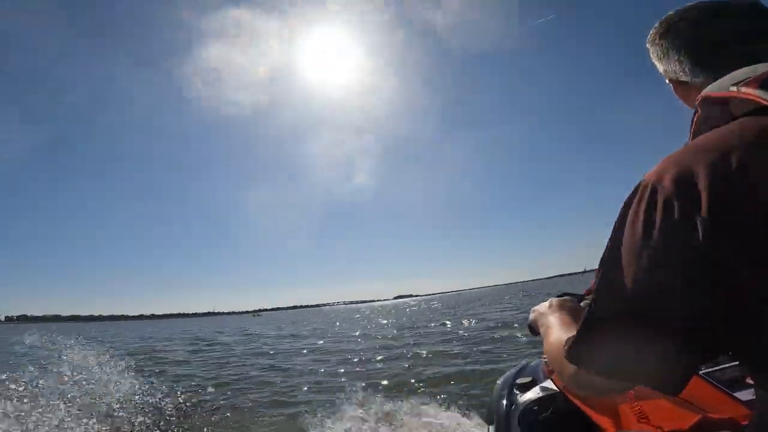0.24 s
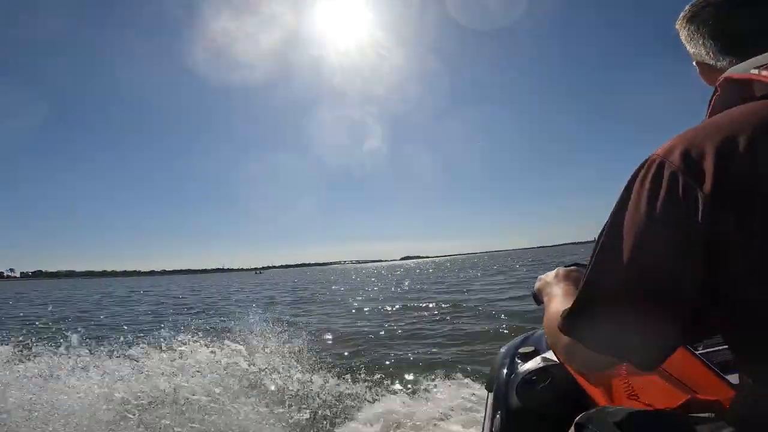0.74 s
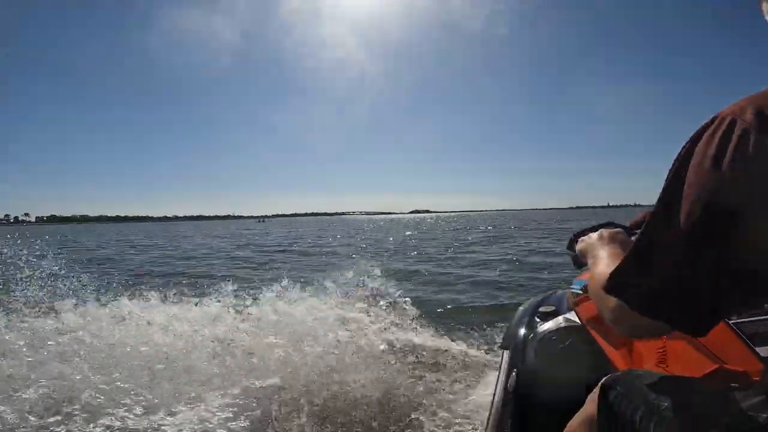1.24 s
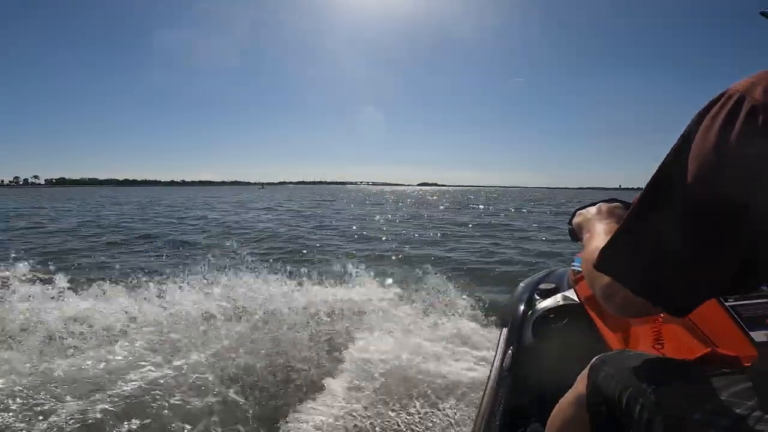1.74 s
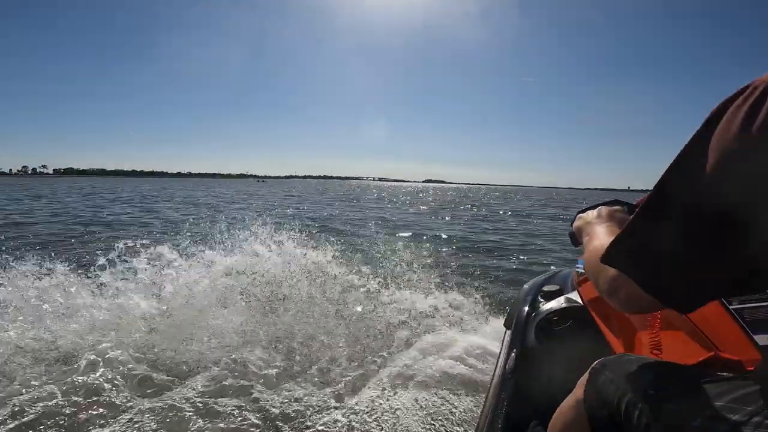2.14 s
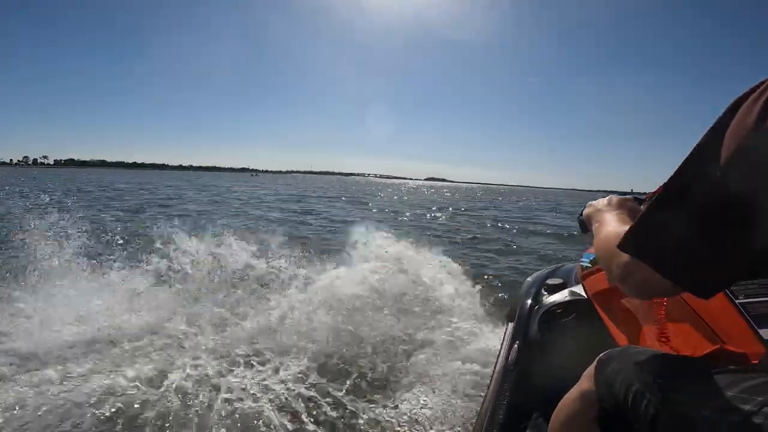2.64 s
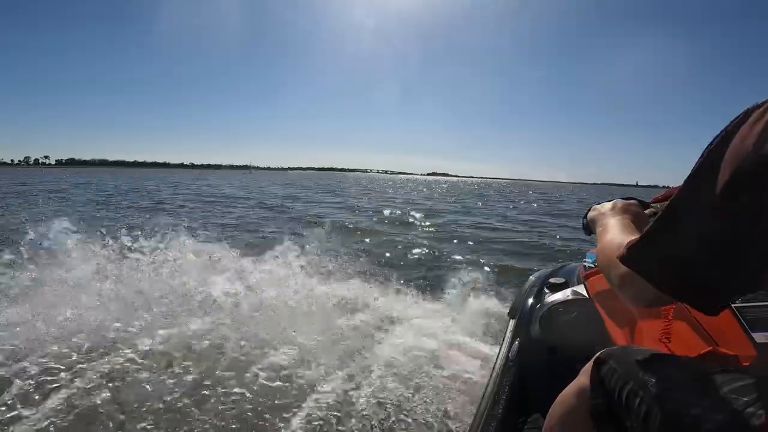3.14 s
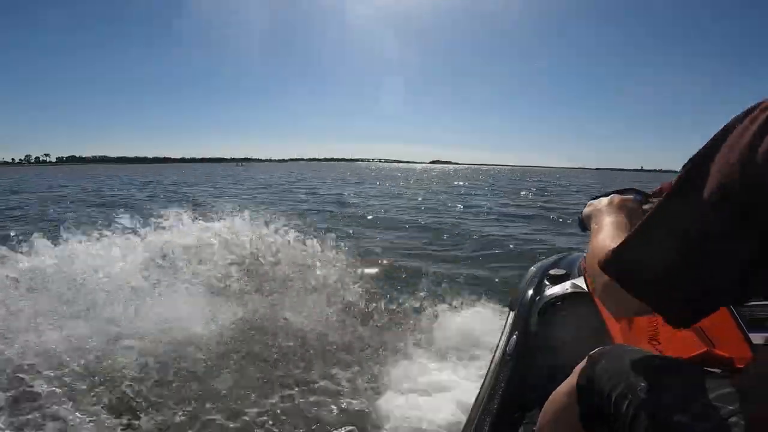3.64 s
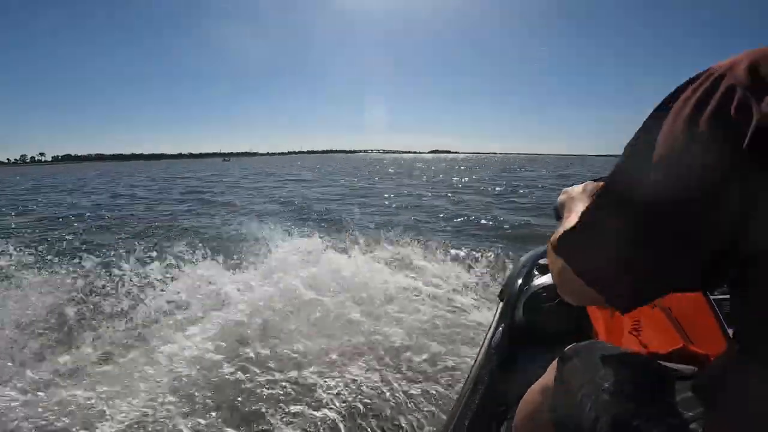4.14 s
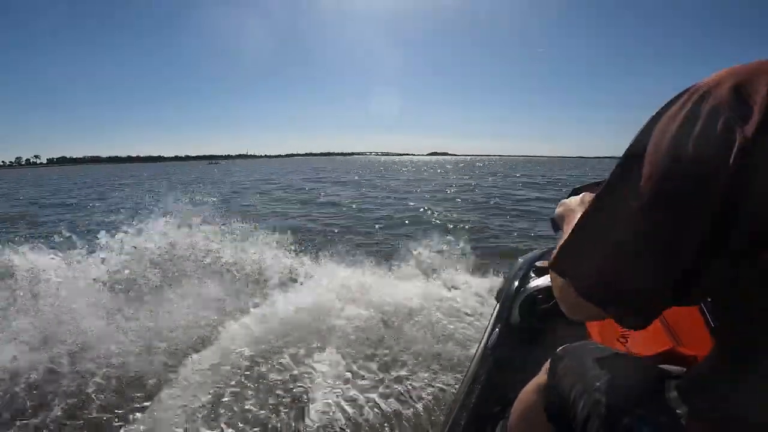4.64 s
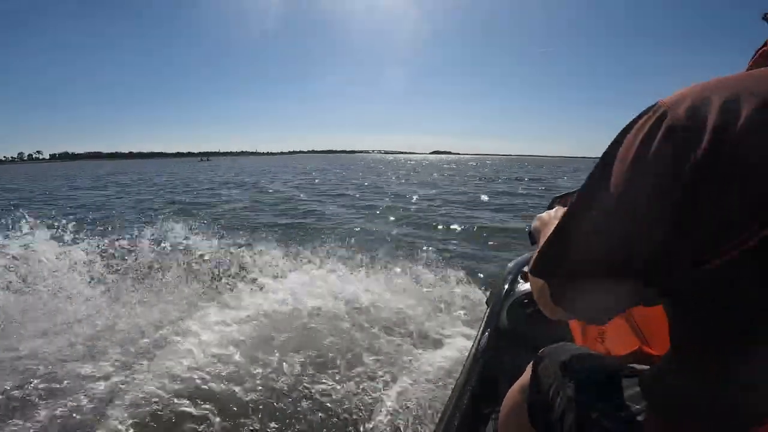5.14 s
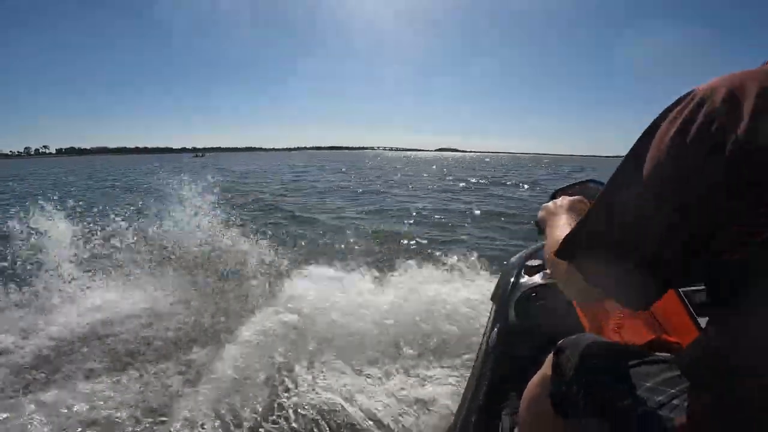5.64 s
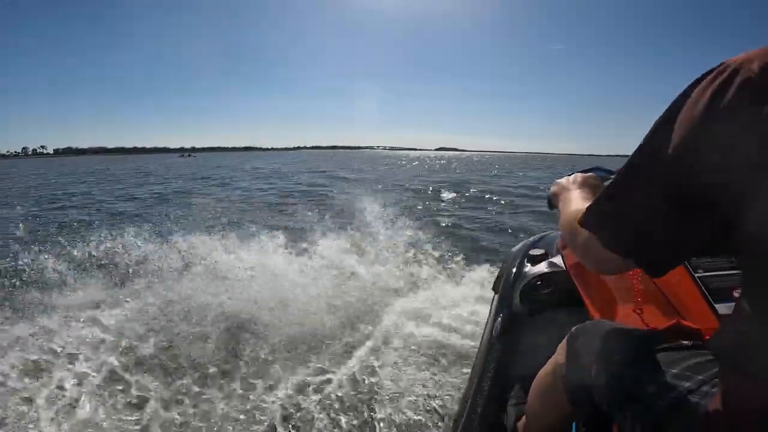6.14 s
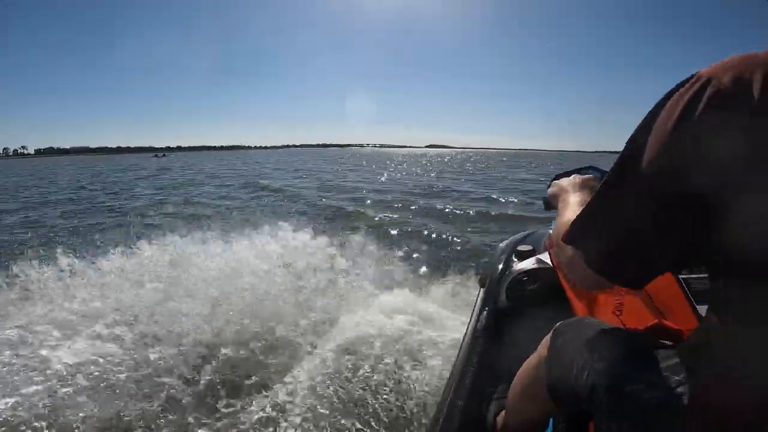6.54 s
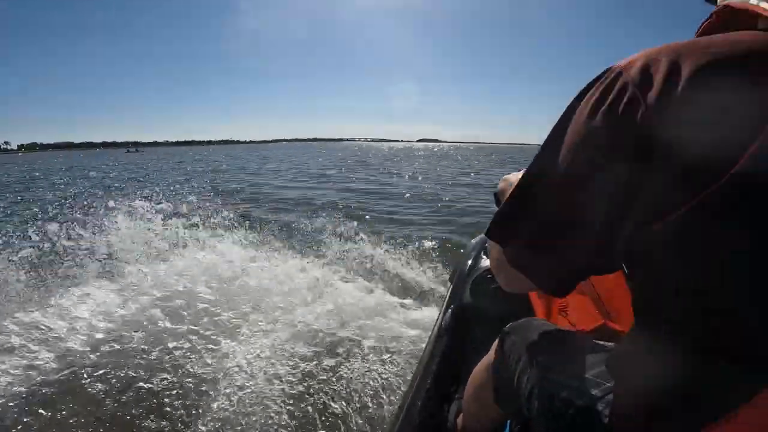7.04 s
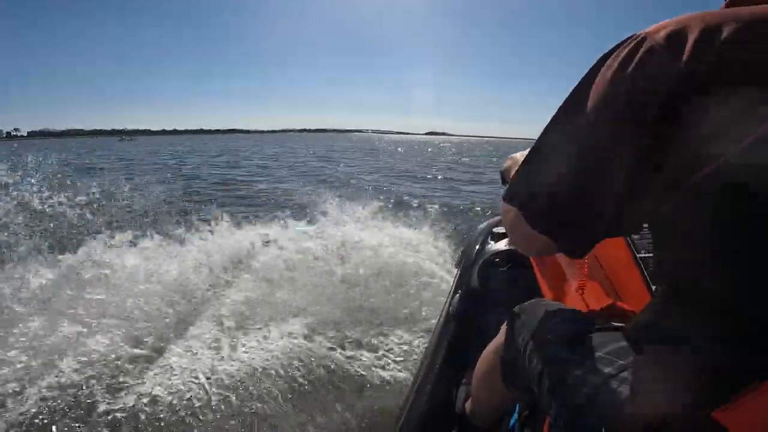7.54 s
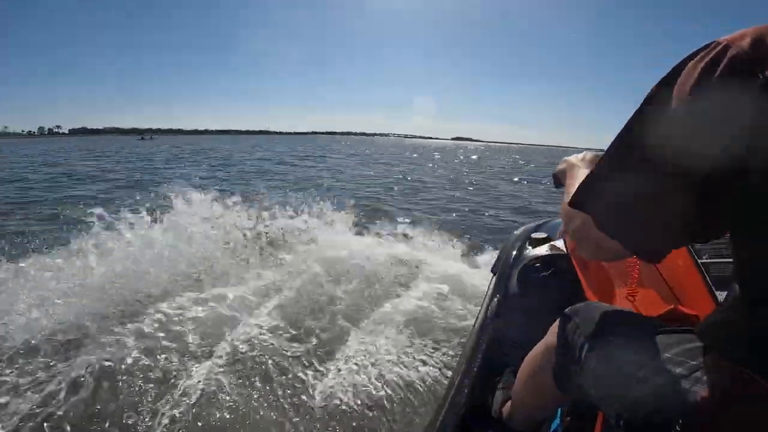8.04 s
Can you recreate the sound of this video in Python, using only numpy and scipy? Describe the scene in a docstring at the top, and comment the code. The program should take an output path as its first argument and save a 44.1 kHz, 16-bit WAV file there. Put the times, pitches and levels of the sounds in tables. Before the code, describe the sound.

A personal watercraft cruises over light chop on open water, its engine holding a steady drone with a thin, wavering whine from the jet pump. The hull booms softly on the waves while the wake rushes and spray hisses in swells. Wind buffets the onboard microphone throughout with low rumble and short, crackling puffs. Near the end the engine pitch dips briefly and recovers.

```python
"""On open water, aboard a personal watercraft cruising over light chop.
Its four-cylinder engine drones and turns a whining three-blade jet pump.
The hull booms on the waves, the wake rushes and spray hisses as countless drops.
Wind buffets the microphone in short ragged blasts, and a limiter ducks the drone under them."""
import sys
import numpy as np
from scipy import signal
from scipy.fft import rfft, irfft, next_fast_len
from scipy.io import wavfile
from scipy.ndimage import uniform_filter1d, minimum_filter1d, map_coordinates

SR = 44100
rng = np.random.default_rng(int(sys.argv[2]) if len(sys.argv) > 2 else 0)


def inscribe(sig):
    """Save sig as 16-bit PCM at rate SR to the path in sys.argv[1].

    A 1-D sig is mono; a 2-D sig holds one channel per row.
    Samples are clipped to [-1, 1] before scaling.
    """
    pcm = np.round(np.clip(np.atleast_2d(sig).T, -1, 1) * 32767)
    wavfile.write(sys.argv[1], SR, pcm.astype(np.int16))


N = 365148

# waves throwing up water: t/s, spray/dB, churn/dB, width/s
WAVE_SPLASHES = [(0.218, -66, -41.5, 0.24), (0.805, -50.5, -41.5, 0.36), (1.27, -51, -40.5, .07),
                 (1.4, -60, -39, 0.14), (2.906, -52, -36.5, 0.086), (3.155, -48.5, -35.5, 0.13),
                 (3.35, -56, -38.5, 0.11), (3.795, -46, -39, 0.1), (4.053, -45.5, -52, 0.17),
                 (4.244, -55, -45, .1), (4.49, -46, -37, .11), (5.03, -42, -41, .13),
                 (5.416, -49, -39, 0.18), (5.767, -56, -35, 0.41), (6.22, -46.5, -44.5, .36),
                 (6.643, -50.5, -50, .2), (7.9, -48, -43, 0.28)]


def amp(db):
    """Decibels to gain."""
    return 10 ** (np.asarray(db) / 20)


def unit(x):
    """Scaled to rms 1."""
    return x / np.sqrt(np.mean(x ** 2) + 1e-20)


def curves(rows):
    """One automation curve for each column after the time."""
    times, *columns = np.transpose(rows)
    return [np.interp(np.arange(N) / SR, times, column) for column in columns]


def wobble(rate):
    """A smooth random curve, rate knots a second."""
    knots = rng.standard_normal(N // 8)
    return map_coordinates(knots, [np.arange(N) * rate / SR + 2], mode="wrap")


def swell(at, width_s):
    """A smooth rise and fall around a moment, width_s wide at half height."""
    return .5 ** ((2 * (np.arange(N) / SR - at) / width_s) ** 2)


def filtered(x, response):
    """x through an EQ whose gain is a function of frequency."""
    size = next_fast_len(N + SR // 2)
    return irfft(rfft(x, size) * response(np.fft.rfftfreq(size, 1 / SR)), size)[:N]


def coloured(x, spectrum):
    """x shaped by (f/Hz, level/dB) points on a log axis, at rms 1."""
    f, db = np.transpose(spectrum)
    return unit(filtered(x, lambda hz: amp(np.interp(np.log(hz + 1), np.log(f), db, right=-120))))


def noise(spectrum):
    """Coloured noise of rms 1."""
    return coloured(rng.standard_normal(N), spectrum)


def drops(rate, spread_db):
    """Tiny impacts of random size, about rate a second, at rms 1."""
    lands = rng.random(N) < rate / SR
    return unit(lands * rng.standard_normal(N) * amp(spread_db * rng.standard_normal(N)))


def patchy(x, depth_db):
    """Each region of pitch swells and fades on its own, at rms 1."""
    bands = signal.stft(x, nperseg=512)[2]
    patches = uniform_filter1d(rng.standard_normal(bands.shape), size=12, axis=0)
    patches = uniform_filter1d(patches, size=14, axis=1)
    return unit(signal.istft(bands * amp(depth_db * unit(patches)), nperseg=512)[1][:N])


def shaft_tones(angle, partials, rough_db, drift_rad, rate):
    """Tones locked to the shaft, wavering in level and phase, at rms 1."""
    tones = np.zeros(N)
    for multiple, db in partials:
        phase = round(multiple) * angle + 2 * np.pi * rng.random() + drift_rad * wobble(rate)
        tones += amp(db + rough_db * wobble(rate)) * np.sin(phase)
    return unit(tones)


def engine(shaft_hz, angle, firing_db):
    """Two firings a turn make a clean drone whose octave rings a hull panel as it slides into tune."""
    panel_hz, half_width_hz = 300, 4
    firing = amp(firing_db) * shaft_tones(angle, [(2, 0)], rough_db=1.04, drift_rad=0.067, rate=30)
    in_tune = 1 / (1 + ((4 * shaft_hz - panel_hz) / half_width_hz) ** 2)
    effort = amp(firing_db - firing_db.mean())
    octave = shaft_tones(angle, [(4, 0)], rough_db=5.0, drift_rad=0.24, rate=20)
    return firing + effort * (amp(-38.5) + amp(-35) * in_tune) * octave


def jet_pump(angle, shake, drone_db, whine_db):
    """The blades hum through the hull; the pump's drone and whine waver in the aerated water."""
    # low, middle and high tones: multiple of the shaft speed, level within the group/dB
    blade_tones = [(3, -4.5), (5, -15)]
    drone_tones = [(6, -2), (7, -14.5)]
    whine_tones = [(12, -1), (15, -9.5)]
    blades = shake * amp(-7.5) * shaft_tones(angle, blade_tones, rough_db=0, drift_rad=0.4, rate=20)
    drone = amp(drone_db) * shaft_tones(angle, drone_tones, rough_db=3.0, drift_rad=0.71, rate=24)
    whine = amp(whine_db) * shaft_tones(angle, whine_tones, rough_db=3.5, drift_rad=0.73, rate=24)
    return blades + drone + whine


def hull_shake():
    """How hard the chop shakes the hull: a restless bed with a swell at each wave."""
    # the hull meets a wave: t/s, peak/dB
    bumps = [(0.69, -18.5), (0.97, -22.5), (1.25, -24), (1.64, -22.5), (2.66, -22), (3.1, -17),
             (4.28, -21.5), (4.48, -17.5), (4.87, -25), (5.14, -22.5), (5.4, -24), (5.65, -21), (5.82, -21),
             (6.53, -23), (6.72, -21.5)]
    bed = amp(-25 + 2 * wobble(9))
    return np.sqrt(bed ** 2 + sum((amp(db) * swell(at, width_s=0.16)) ** 2 for at, db in bumps))


def hull_boom(shake):
    """The shaken hull booms in a narrow low band."""
    # hull resonance: f/Hz, level/dB
    boom_eq = [(90, -37.5), (150, -3.5), (185, 0.5), (222, 0.5), (255, -8.5), (330, -23), (600, -44.5)]
    return shake * noise(boom_eq)


def wake():
    """Water tumbles beside the hull and churns harder at each splash."""
    # the running wash: t/s, level/dB
    wash = [(0, -42.5), (0.5, -42.5), (1.1, -43.5), (1.9, -41), (2.9, -39), (3.55, -40.5), (4.7, -38.5),
            (5.45, -38.5), (6.1, -38), (7.35, -37), (8.28, -35.5)]
    # tumbling water: f/Hz, level/dB
    wake_eq = [(200, -9.5), (600, -6.5), (1200, -2.5), (1700, 2.1), (2200, 0.5), (3100, -2), (4700, -12),
               (6000, -24), (9000, -44)]
    wash_db, = curves(wash)
    power = amp(wash_db + 0.35 * wobble(16)) ** 2
    power += sum((amp(db) * swell(at, width_s)) ** 2 for at, _, db, width_s in WAVE_SPLASHES)
    level = np.sqrt(power) * amp(0.87 * wobble(60))
    return level * patchy(coloured(drops(rate=16000, spread_db=3.0), wake_eq), depth_db=1)


def spray():
    """Countless drops fall in a hissing sheet, and each splash throws up more."""
    # the steady sheet: t/s, level/dB
    sheet_levels = [(0, -47), (1.5, -49), (2.6, -47), (3.4, -49), (6.2, -47), (7.25, -49), (8.28, -47)]
    # the sheet's hiss and freshly thrown water: f/Hz, level/dB
    sheet_eq = [(1500, -24), (3200, 6), (4600, 5), (6200, -1.5), (7400, -2.5), (8700, -8.5), (10500, -15),
                (12000, -23.5), (14500, -35.5)]
    thrown_eq = [(1200, -10), (2800, 4), (4500, 6.5), (6200, -4.5), (8700, -11), (12000, -23.5),
                 (14500, -38.5)]
    sheet_db, = curves(sheet_levels)
    level = amp(sheet_db + 0.93 * wobble(27))
    sheet = level * patchy(coloured(drops(rate=18000, spread_db=-1.5), sheet_eq), depth_db=1.1)
    power = sum((amp(db) * swell(at, width_s)) ** 2 for at, db, _, width_s in WAVE_SPLASHES)
    thrown = np.sqrt(power) * coloured(drops(rate=20000, spread_db=2.5), thrown_eq)
    return sheet + thrown


def water():
    """Wake and spray together; their hiss dips briefly now and then."""
    # dips in the hiss: t/s, depth/dB (negative lifts it)
    lulls = [(1.01, 3.5), (1.66, 3), (3.26, 0), (4.41, 3.5), (4.58, -1.5), (6.85, 2)]
    dip_db = sum(db * swell(at, width_s=0.06) for at, db in lulls)
    return amp(-dip_db) * (wake() + spray())


def wind():
    """Eddies thump the microphone, harder in the gusts; the strongest tear into a ragged flutter."""
    # the wind bed: t/s, buffet/dB, flutter/dB
    breeze = [(0, -20.5, -28.5), (1.05, -22.5, -30), (1.5, -21.5, -28), (1.9, -22.5, -29.5),
              (2.7, -21, -28.5), (3.3, -19, -27), (3.7, -20, -29), (4.25, -18, -25.5), (4.9, -21, -29),
              (5.2, -21.5, -29.5), (5.85, -20, -26), (6.15, -23, -29), (6.8, -21.5, -28), (7.3, -26, -29.5),
              (8.28, -22.5, -24.5)]
    # broad gusts: t/s, peak/dB
    gusts = [(0.99, -18.5), (1.49, -14.5), (3.25, -20.5), (3.35, -9.5)]
    # deep buffet and midrange flutter: f/Hz, level/dB
    buffet_eq = [(12, -15.5), (22, 1.5), (50, -4.5), (100, -7), (170, -14), (300, -26), (700, -46.5)]
    flutter_eq = [(60, -20), (200, -9.5), (330, 2), (480, -1), (750, -4.5), (1200, -10.5), (2000, -20.5),
                  (4000, -35.5), (9000, -55.5)]
    buffet_db, flutter_db = curves(breeze)
    eddies = wobble(40)
    bed = amp(buffet_db + 2.5 * wobble(16))
    gust_power = sum((amp(db) * swell(at, width_s=0.063)) ** 2 for at, db in gusts)
    buffet = np.sqrt(bed ** 2 + gust_power) * unit(amp(2.1 * eddies) * noise(buffet_eq))
    flutter = amp(flutter_db) * unit(amp(1.16 * eddies + 1.7 * wobble(260)) * noise(flutter_eq))
    return buffet + flutter


def blasts():
    """Air hits the microphone and swells within milliseconds: a dull puff with a crackle on top."""
    # blasts of air: t/s, puff/dB, crackle/dB
    hits = [(0.112, -20.5, -32), (0.312, -21.5, -45), (0.893, -27, -44), (1.320, -23.5, -45),
            (1.437, -22.5, -47), (1.482, -18, -32), (1.540, -27.5, -38), (1.636, -24, -41),
            (1.717, -29, -35), (2.406, -22, -39), (2.929, -22, -42), (3.216, -23, -34), (3.32, -19.5, -42),
            (3.359, -18, -39), (3.825, -17.5, -31), (3.858, -24, -38), (4.047, -28, -45),
            (4.122, -32.5, -41), (4.164, -22.5, -44), (4.215, -18, -38), (4.372, -16.5, -30.5),
            (4.391, -26, -41), (4.524, -22, -40), (4.848, -22.5, -44), (4.979, -23, -45),
            (5.167, -24.5, -35), (5.433, -30, -44), (5.86, -21, -34), (5.943, -25, -40), (6.372, -19, -35),
            (6.714, -24.5, -45), (6.803, -23, -40), (6.83, -22, -35), (6.861, -23, -42),
            (7.029, -23.5, -43)]
    attack_s = 0.0063
    t = np.arange(N) / SR
    puff, crackle = np.zeros((2, N))
    for at, puff_db, crackle_db in hits:
        span = slice(int(at * SR), int(at * SR) + SR // 10)
        age = np.maximum(t[span] - at, 0) / attack_s
        push = age * np.exp(1 - age)
        puff[span] += amp(puff_db) * push
        crackle[span] += amp(crackle_db) * push
    dull = noise([(60, -8), (250, 5.5), (800, 1.5), (1400, -6.5), (2800, -21.5), (6000, -50.5)])
    bright = noise([(500, -23.0), (1400, 3.0), (2600, -4.0), (4500, -10.5), (10000, -45.5)])
    raggedness = unit(amp(1.6 * wobble(300)))
    return (puff * dull + crackle * bright) * raggedness


def scene():
    """Engine and pump on one shaft, mixed in mono with hull, water and wind."""
    # the shaft hunts on the chop and the throttle eases near 7 s: t/s, rotation/Hz
    shaft_speed = [(0, 73.3), (0.5, 72.3), (0.8, 70.2), (1.35, 70.4), (1.65, 72.3), (2, 70.7), (2.35, 73),
                   (2.8, 73.9), (3.05, 73.2), (3.85, 72.9), (4.2, 71.8), (5.25, 72.8), (5.5, 72.2),
                   (5.95, 74.8), (6.42, 74.7), (6.65, 72.6), (6.9, 68.6), (7.05, 67.6), (7.25, 69),
                   (7.48, 72.3), (8, 70.2), (8.28, 69.6)]
    # load on the drive: t/s, firing tone/dB, pump drone/dB, pump whine/dB
    load = [(0, -15.5, -38, -50), (0.4, -17.5, -34, -43), (1.15, -15.7, -29, -43.5),
            (1.55, -18.5, -33.5, -43), (2.1, -15, -30.5, -44.5), (2.75, -16.5, -39.5, -42.5),
            (3.2, -17, -32.5, -40.5), (3.9, -19, -38.5, -42.5), (4.7, -17, -36, -48.5),
            (5.5, -15.5, -36, -52.5), (6.65, -16.5, -38.5, -52), (7.1, -15.5, -29, -49),
            (7.45, -14, -29, -51.5), (8.28, -13.8, -27, -43)]
    shaft_hz, = curves(shaft_speed)
    firing_db, drone_db, whine_db = curves(load)
    angle = 2 * np.pi * np.cumsum(shaft_hz) / SR
    shake = hull_shake()
    drive = engine(shaft_hz, angle, firing_db) + jet_pump(angle, shake, drone_db, whine_db)
    return (drive + water() + hull_boom(shake) + wind() + blasts())[None]


def limiter(x, knee_db, hold_s, slope):
    """The gain drops just ahead of each peak by a share (slope) of its excess over the knee."""
    size = max(int(hold_s * SR), 8)
    needed = np.minimum(1, amp(knee_db) / (np.abs(x) + 1e-9)) ** np.clip(slope, 0, 1)
    return x * uniform_filter1d(minimum_filter1d(needed, size), size)


def record(dry):
    """The camera limits the peaks and cuts the highest treble."""
    limited = limiter(dry[0] * amp(.3), knee_db=-6.5, hold_s=.01, slope=.75)
    return filtered(limited, lambda hz: hz < 14400)[None]


dry = scene()
out = record(dry)
inscribe(out)
```